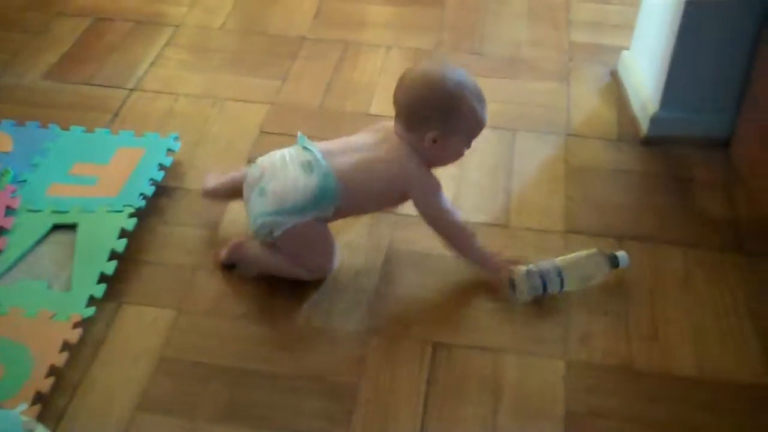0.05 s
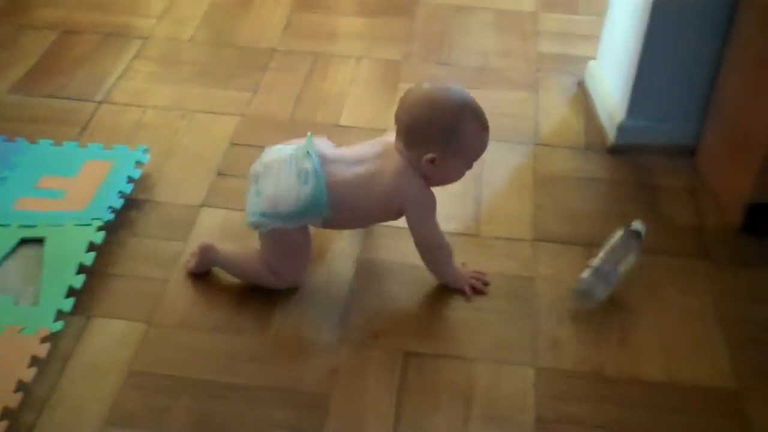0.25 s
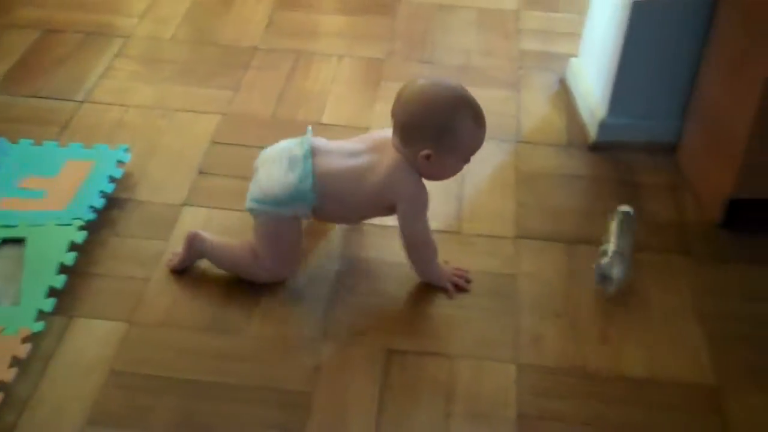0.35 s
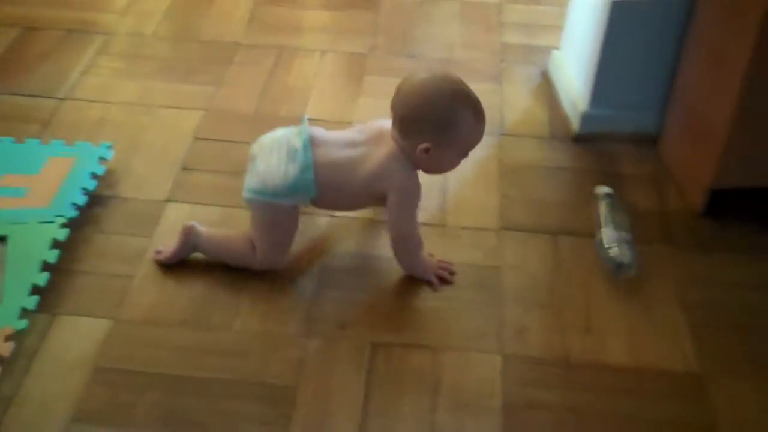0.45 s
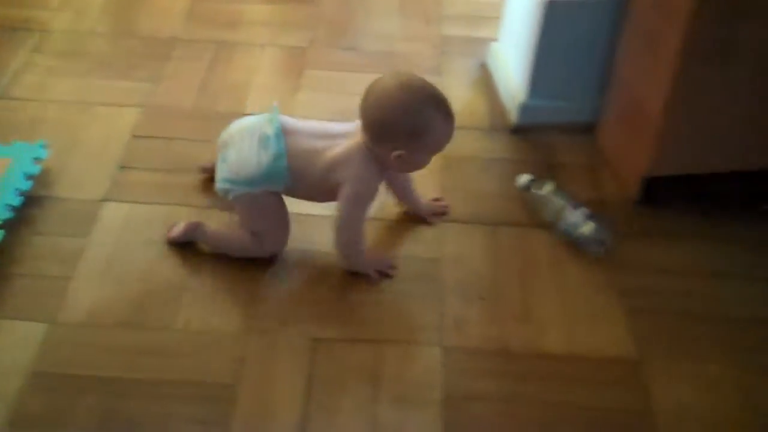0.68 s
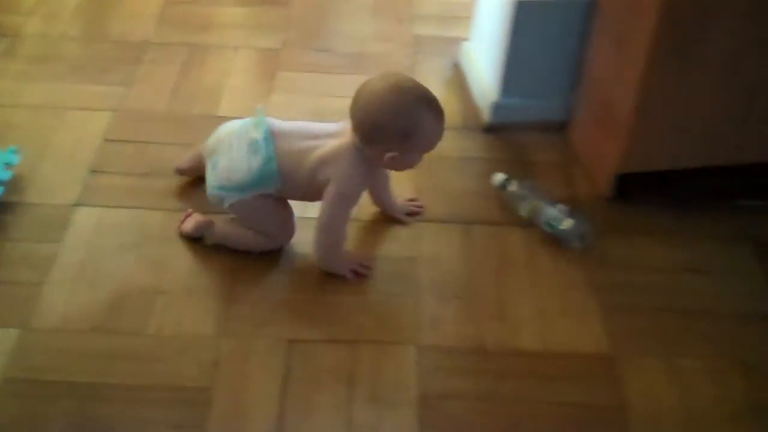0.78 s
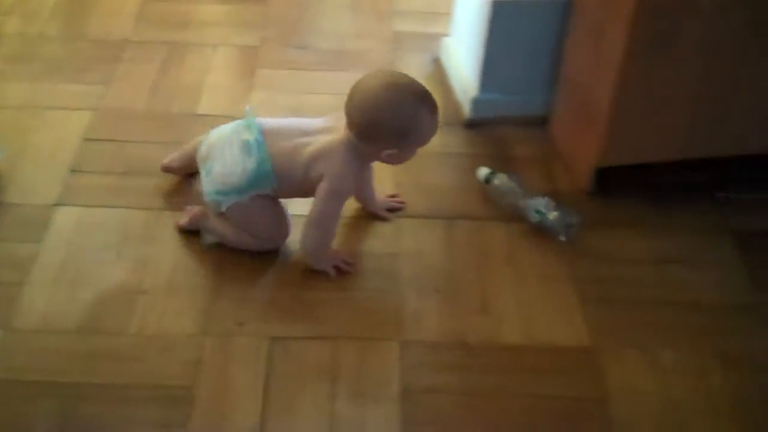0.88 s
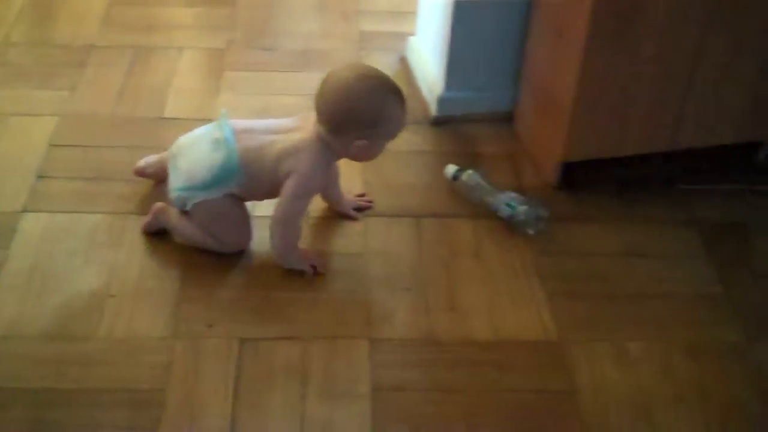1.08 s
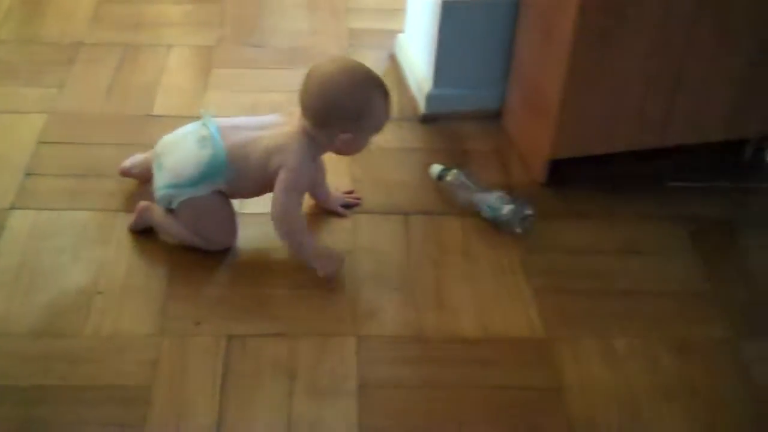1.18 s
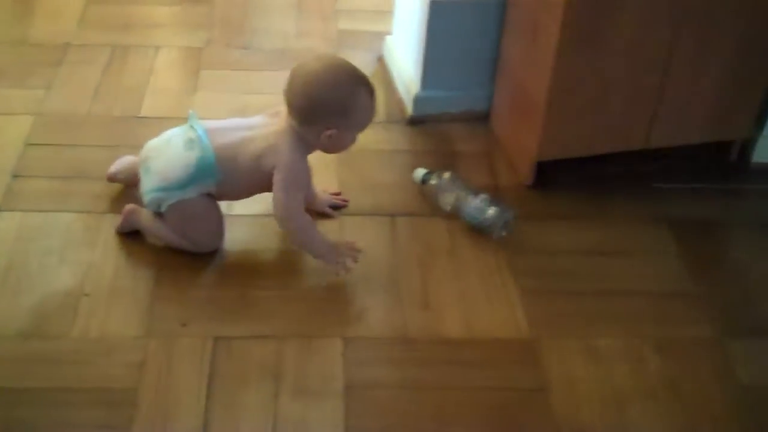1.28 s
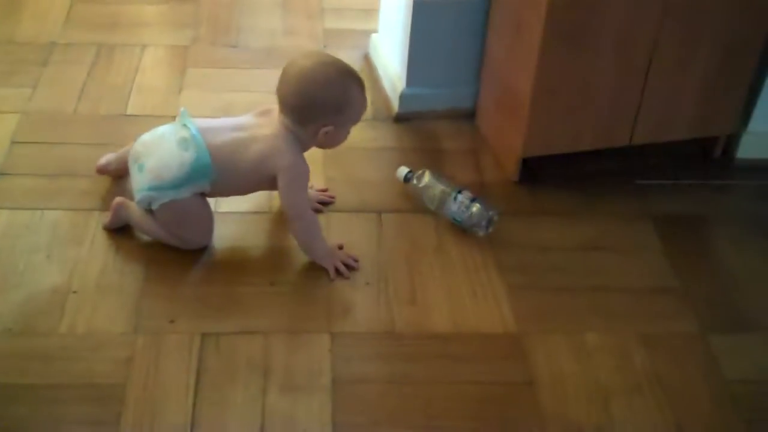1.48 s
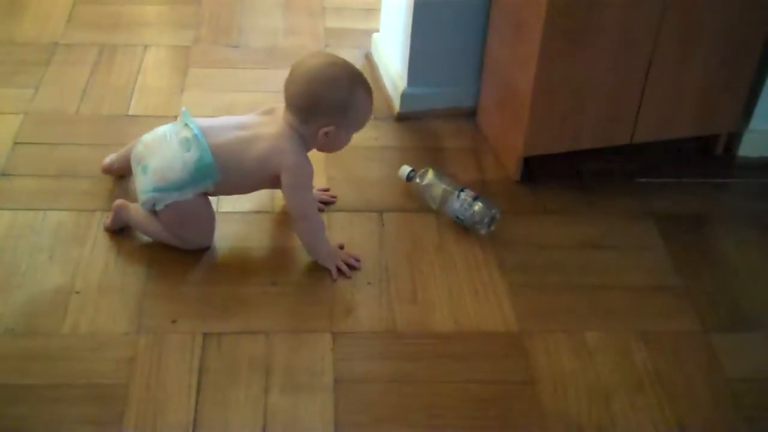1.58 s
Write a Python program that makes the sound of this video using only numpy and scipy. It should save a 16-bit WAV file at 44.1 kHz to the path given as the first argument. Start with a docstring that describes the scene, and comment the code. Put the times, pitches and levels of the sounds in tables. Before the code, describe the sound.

Hollow plastic bottle tumbling on indoor floorboards, its clacks quickening into a fading rattle.

```python
"""A live room with a wooden floor: an empty plastic bottle is knocked over about two metres away.
It bounces from end to end, rattles faster and rolls to rest. Each impact excites the thin shell
into a tick and a clack, and sets the modes of its wall, base and hollow body ringing; the body's
boom swells and fades. Reverberation carries the knocks on, and a crawling baby's palms pat faintly."""
import sys
import numpy as np
from scipy import signal
from scipy.fft import rfft, irfft
from scipy.io import wavfile

SR = 44100
rng = np.random.default_rng(int(sys.argv[2]) if len(sys.argv) > 2 else 0)


def unload_wav(signal):
    """Save mono or channel-first audio to the path in sys.argv[1] as 16-bit WAV at rate SR, clipped to [-1, 1]."""
    wavfile.write(
        sys.argv[1],
        SR,
        np.round(np.clip(np.atleast_2d(signal).T, -1, 1) * 32767).astype(np.int16),
    )


N = 72765
T = np.arange(N) / SR
FFT_SIZE = 131072
HZ = np.maximum(np.fft.rfftfreq(FFT_SIZE, 1 / SR), 1)

# spectrum of the shell's clack (frequency [Hz], relative level [dB])
CLACK_SPECTRUM = [(40, -51), (90, -39), (135, -29), (200, -3.5), (450, -4.5), (650, -5.5), (1000, -2.5),
                  (1600, 0), (2100, -4), (2700, -4), (4000, -6.5), (6000, -14.5), (9000, -21.5),
                  (16000, -62.5)]
# spectrum of the shell's brighter tick (frequency [Hz], relative level [dB])
TICK_SPECTRUM = [(100, -34), (1000, -21.5), (3000, -4.5), (4500, -7.5), (6000, 4.5), (7700, 7.5),
                 (8600, -3.5), (9600, -13.5), (13500, -23), (15500, -30)]
# left-right coherence of the diffuse field (frequency [Hz], coherence [0-1])
DIFFUSE_COHERENCE = [(30, 0.74), (200, 1), (600, 0.93), (1400, .78), (3000, 0.16), (7000, 0), (14000, 0)]


def undb(db):
    """Amplitude ratio of a level in decibels."""
    return 10 ** (np.asarray(db) / 20)


def curve(table):
    """Interpolation of a table over logarithmic frequency."""
    hz, values = np.array(table, float).T
    return np.interp(np.log(HZ), np.log(hz), values)


def unit_power(db):
    """Normalisation: the response is shifted to conserve the power of white noise."""
    return db - 10 * np.log10(np.mean(undb(db) ** 2))


def colour(x, db):
    """Minimum-phase filtering: folding the cepstrum makes the dB response causal."""
    cepstrum = irfft(np.log(undb(db)))
    cepstrum[1:FFT_SIZE // 2] *= 2
    cepstrum[FFT_SIZE // 2 + 1:] = 0
    return irfft(rfft(x, FFT_SIZE) * np.exp(rfft(cepstrum)))[..., :N]


def convolve(x, response):
    """Convolution with an impulse response."""
    return irfft(rfft(x, FFT_SIZE) * rfft(response, FFT_SIZE))[..., :N]


def decay(t60):
    """Exponential damping by 60 dB in t60 seconds."""
    return np.exp(-np.minimum(np.log(1000) * T / t60, 20))


def delay(x, seconds):
    """Time delay, rounded down to whole samples."""
    return np.pad(x, ((0, 0), (int(seconds * SR), 0)))[:, :N]


def diffuse_noise():
    """Partial coherence: mid and side noise mix so that the channels agree mainly in the bass."""
    mid, side = rfft(rng.standard_normal((2, FFT_SIZE)))
    coherence = curve(DIFFUSE_COHERENCE)
    mid = mid * np.sqrt((1 + coherence) / 2)
    side = side * np.sqrt((1 - coherence) / 2)
    return irfft([mid + side, mid - side])[:, :N]


def impact(t60, coherence):
    """Impact transient of unit energy: a sharp crack, a dense damped ring and a second slap."""
    size = 4096
    envelope = (decay(t60) + undb(3) * decay(t60=0.0013))[None]
    envelope = (envelope + undb(-6) * delay(envelope, seconds=0.0029))[:, :size]
    common = np.sqrt(coherence) * rng.standard_normal(size)
    separate = np.sqrt(1 - coherence) * rng.standard_normal((2, size))
    burst = envelope * (common + separate)
    burst /= np.sqrt(np.sum(burst ** 2, axis=1, keepdims=True))
    return np.pad(burst, ((0, 0), (0, N - size)))


def background():
    """Stationary diffuse noise: the quiet rumble and hiss of the home."""
    # ambient spectrum (frequency [Hz], relative level [dB])
    spectrum = [(15, -41), (27, 9), (42, -12), (80, -2), (130, -8), (240, 1.5), (400, -9), (1000, -11),
                (2000, -16.5), (4000, -21), (7200, -15.5), (10000, -28.5), (13800, -33.5), (15000, -34)]
    return undb(-49.5) * colour(diffuse_noise(), unit_power(curve(spectrum)))


def room_response():
    """Reverberation: reflections from hard walls build up, then decay, most slowly in the bass."""
    # reverberant bands (frequency [Hz], t60 [s], level [dB])
    bands = [(150, 0.65, 17.5), (503, 0.33, 11), (1140, 0.45, 2.5), (3000, 0.34, 0), (7230, 0.43, -5.5),
             (13500, 0.23, 4.5)]
    onset_s = 0.0036
    noise, response = rfft(diffuse_noise(), FFT_SIZE), 0
    log_centres = np.log([row[0] for row in bands])
    for share, (_, t60, db) in zip(np.eye(len(bands)), bands):
        envelope = decay(t60) * (1 - np.exp(-T / onset_s))
        band = irfft(noise * np.interp(np.log(HZ), log_centres, share))[:, :N]
        response += undb(db) * band * envelope / np.sqrt(np.sum(envelope ** 2))
    return response


def palm_pats():
    """Soft impact: a crawling baby's palms excite the boards mostly at low frequencies."""
    # palm landings (time [s], level [dB])
    landings = [(1.432, -34.5), (1.545, -31)]
    # spectrum of a palm on wood (frequency [Hz], relative level [dB])
    spectrum = [(60, -21), (230, 4), (400, -6), (900, -31), (2500, -15), (6000, -39), (15000, -55)]
    pats = sum(delay(undb(db) * impact(t60=0.053, coherence=0.98), s) for s, db in landings)
    return colour(pats, unit_power(curve(spectrum)))


def skid_squeak():
    """Friction: plastic skidding on varnish gives a brief, slightly rising chirp."""
    peak_s, half_width_s = 0.303, 0.012
    centre_hz, glide_hz_per_s = 1550, 7000
    t = T - peak_s
    envelope = undb(-33) * np.exp(-(t / half_width_s) ** 2)
    return envelope * np.sin(2 * np.pi * (centre_hz * t + glide_hz_per_s * t ** 2 / 2))


def shell_filter(x, spectrum):
    """Resonance: the thin shell adds Lorentzian peaks and a notch to a contact's spectrum."""
    # shell resonances (frequency [Hz], bandwidth [Hz], gain [dB])
    resonances = [(2200, 110, 2.5), (3190, 1300, 2), (4520, 620, 5.5), (5140, 23, -12), (6260, 990, 3.5),
                  (7994, 47, 7)]
    lift_db = sum(db / (1 + (2 * (HZ - hz) / width) ** 2) for hz, width, db in resonances)
    return colour(x, unit_power(curve(spectrum) + lift_db))


def rolling():
    """Shot noise: tiny random contacts blur into a rustle, first a hand's brief scuff, then the shell sliding
    and rolling."""
    # strength of the contacts, a hand's scuff early on, then the shell on the boards (time [s], level [dB])
    contour = [(.16, -76), (.175, -43.5), (.185, -49), (.187, -34.5), (.21, -36.5), (.27, -41.5),
               (.36, -47.5), (.42, -72), (.72, -47), (.77, -44.5), (.87, -43.5), (.97, -47.5),
               (1.08, -55.5), (1.14, -66)]
    grains_per_s, spread_db = 2500, 2
    hits = rng.random(N) < grains_per_s / SR
    grains = hits * rng.standard_normal(N) * undb(spread_db * rng.standard_normal(N))
    envelope = undb(np.interp(T, *np.array(contour).T, left=-120, right=-120))
    rustle = convolve(grains / np.std(grains) * envelope, impact(t60=0.015, coherence=0.4))
    return shell_filter(rustle, TICK_SPECTRUM) + undb(-4.5) * shell_filter(rustle, CLACK_SPECTRUM)


def ring(modes, scatter_db=2.5, detune=0.012):
    """Modal superposition: damped sines swell and die, weighted and detuned anew by each contact."""
    size = 28000
    t, ringing = T[:size], 0
    offsets = rng.uniform(-1.33, 1, (len(modes), 2))
    for (hz, db, t60, swell_s), (level_offset, pitch_offset) in zip(modes, offsets):
        envelope = np.exp(-np.log(1000) * t / t60) * (1 - np.exp(-t / swell_s))
        tone = np.sin(2 * np.pi * hz * (1 + detune * pitch_offset) * t)
        ringing += undb(db + scatter_db * level_offset) * envelope * tone
    return np.pad(ringing, (0, N - size))[None]


def bounces():
    """Impulsive excitation: each landing clacks, ticks and rings the bottle's body, wall and base."""
    # floor contacts (time [s], boom level [dB], wall level [dB], clack level [dB], tick level [dB],
    # tick cut-off [Hz], tick left minus right [dB]); levels are relative within a column
    contacts = [ (.2127, -23, -26.5, -21.5, 1.5, 14040, 3.5), (.2153, -22, -36, -15, -18.5, 13900, 14.5),
                (.2250, -19.5, -35, -51, -26, 11000, -9), (.3184, -29, -35, -45, -10.5, 8600, -0.5),
                (0.3758, -65.5, -39, -32, -22, 9100, 9), (0.402, -11.5, -23.5, -4, 0.5, 6500, -4.5),
                (0.5171, -25.5, -26.5, -14, -5, 6940, -0.5), (.6031, -33, -41, -18.5, -26, 10000, 19.5),
                (.6120, -17, -19, -29.5, -14, 9350, -0.5), (.6940, -34.5, -30.5, -24, -30.5, 11500, 20),
                (.6986, -30, -28.5, -23.5, -20, 9000, -2), (.7450, -21, -27.5, -26, -10.5, 8040, -1),
                (.7767, -29.5, -31, -22, -21.5, 9000, 4), (.8338, -22, -24, -29.5, -16, 8430, 0),
                (.8468, -42, -56, -25.5, -22.5, 10200, -5), (.8981, -30, -25.5, -29, -18.5, 9850, 7),
                (.9270, -27, -43, -29.5, -24, 9900, -4), (.9545, -28, -29.5, -26, -24, 9900, -1),
                (1.0011, -30, -37.5, -27.5, -32, 6900, -11), (1.0291, -31, -29.5, -27, -24, 8800, 2),
                (1.0624, -31.5, -32.5, -27, -34, 9050, 23), (1.0958, -40.5, -65, -35.5, -34, 8000, 0),
                (1.1952, -47, -64, -51, -25.5, 5270, 3)]
    # hollow body on the boards (frequency [Hz], level [dB], t60 [s], swell time [s])
    body_modes = [(224.2, 9.5, 0.22, 0.04), (230.7, -15.5, 0.85, 0.1), (192.9, -20, 0.39, 0.029),
                  (262.3, 5, 0.052, 0.0064)]
    # bottle wall (frequency [Hz], level [dB], t60 [s], swell time [s])
    wall_modes = [(520.7, 2, 0.099, 0.0053), (539.4, 1.5, 0.14, 0.017), (572, -11, .22, 0.024),
                  (774.7, -12.5, 0.34, 0.0033), (795.4, -14, 0.099, 0.0014)]
    # stiff base, rung by the clack (frequency [Hz], level [dB], t60 [s], swell time [s])
    base_modes = [(354.5, -37, 0.45, .01), (413.4, -28.5, 0.16, 0.0039), (436, -18.5, 0.18, 0.011),
                  (605, -28, 0.24, 0.0055), (891, -29, 0.48, .003), (1034.5, -24, 0.28, 0.0072),
                  (1069, -34.5, 0.26, 0.006), (1820, -33, 0.25, 0.0029), (1973, -20, 0.1, 0.00067),
                  (2094, -31, 0.16, 0.0023), (2076, -22.5, 0.18, 0.0024)]
    knock_gain_db, hard_blow_db = 10, -6
    boom = ring(body_modes, scatter_db=0, detune=0)
    booms = rings = clacks = ticks = 0
    for s, boom_db, wall_db, clack_db, tick_db, cutoff_hz, pan_db in contacts:
        booms += delay(undb(boom_db) * boom, s)
        rings += delay(undb(wall_db) * ring(wall_modes) + undb(clack_db) * ring(base_modes), s)
        clack_t60 = 0.0255 + 0.000595 * max(hard_blow_db - clack_db, 0)  # gentle contacts press longer
        clacks += delay(undb(knock_gain_db + clack_db) * impact(clack_t60, coherence=0.98), s)
        tick = delay(undb(knock_gain_db + tick_db) * impact(t60=0.013, coherence=0.73), s)
        lowpass = signal.butter(2, cutoff_hz, fs=SR, output="sos")
        pan = undb(np.array([[pan_db], [-pan_db]]) / 2)
        ticks += pan * signal.sosfilt(lowpass, tick + 1e-18)
    knocks = shell_filter(clacks, CLACK_SPECTRUM) + shell_filter(ticks, TICK_SPECTRUM)
    return booms, rings, knocks


def scene():
    """Superposition: direct sound and echo reach two differently coloured ports, the right one first."""
    # colour of the microphone ports (frequency [Hz], left minus right [dB])
    port_balance = [(200, -1), (1200, -1.5), (2500, -1.5), (4600, -3.5), (6000, -7.5), (7200, 5.5),
                    (8500, 16), (13000, 18.5)]
    booms, rings, knocks = bounces()
    contact_noise = knocks + rolling() + skid_squeak() + palm_pats()
    reverberation = convolve(contact_noise + undb(-11) * rings, room_response())
    left, right = booms + rings + contact_noise + reverberation
    left = np.pad(left, (1, 0))[:N]  # one sample later
    tilt_db = curve(port_balance) / 2
    return np.array([colour(left, tilt_db), colour(right, -tilt_db)]) + background()


def record(dry):
    """Clipping and band limiting: peaks stop at full scale and a steep low-pass cuts the top."""
    cutoff_hz = 14600
    lowpass = signal.ellip(8, 0.2, 70, cutoff_hz, fs=SR, output="sos")
    return signal.sosfilt(lowpass, np.clip(dry, -1, 1))


dry = scene()
out = record(dry)
unload_wav(out)
```